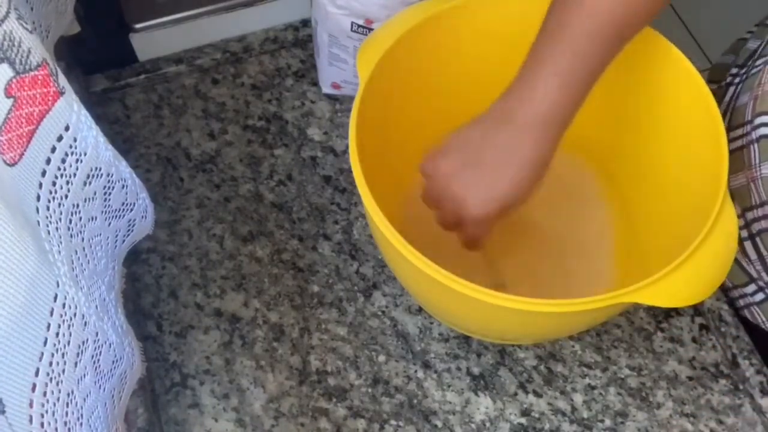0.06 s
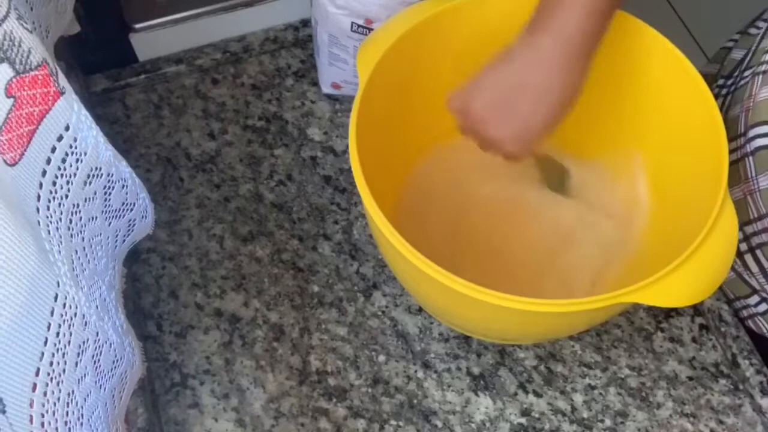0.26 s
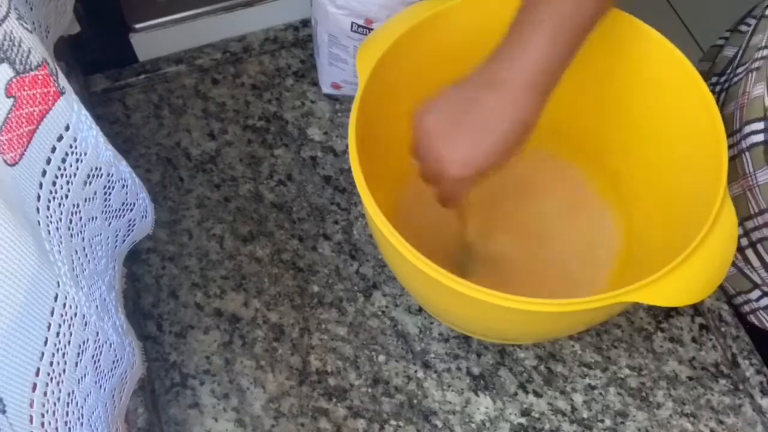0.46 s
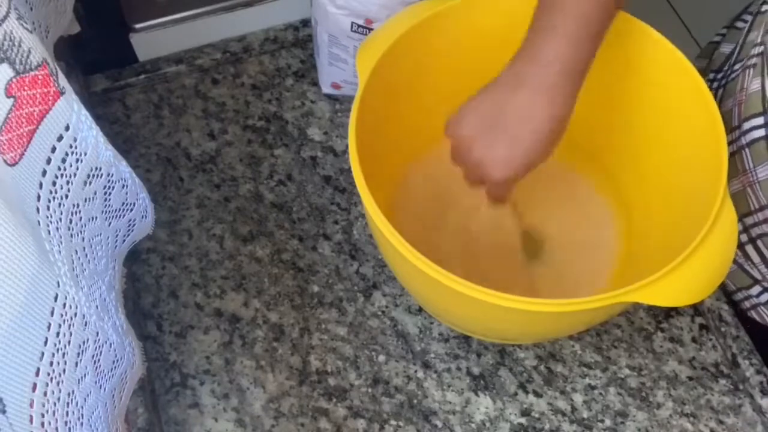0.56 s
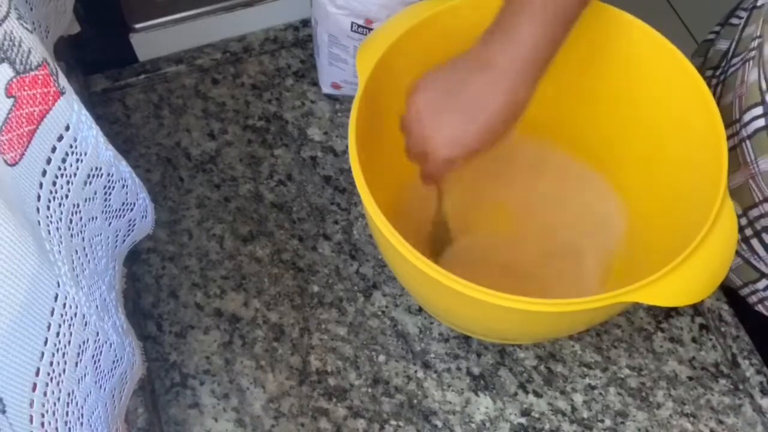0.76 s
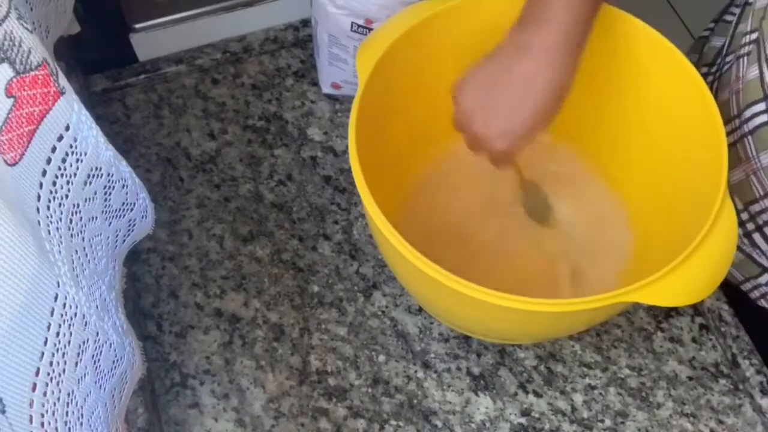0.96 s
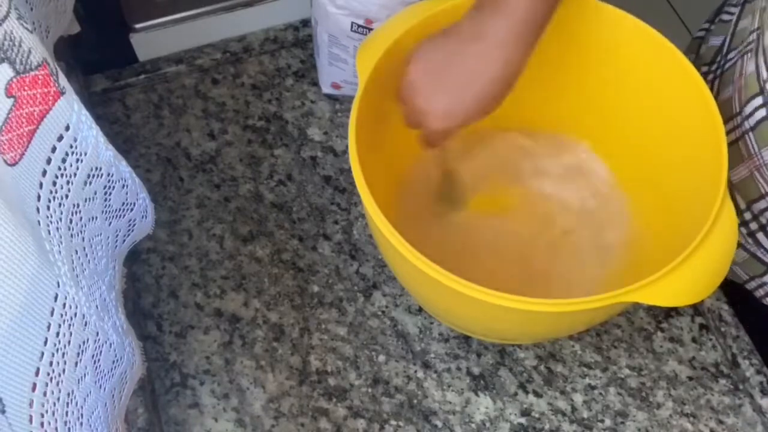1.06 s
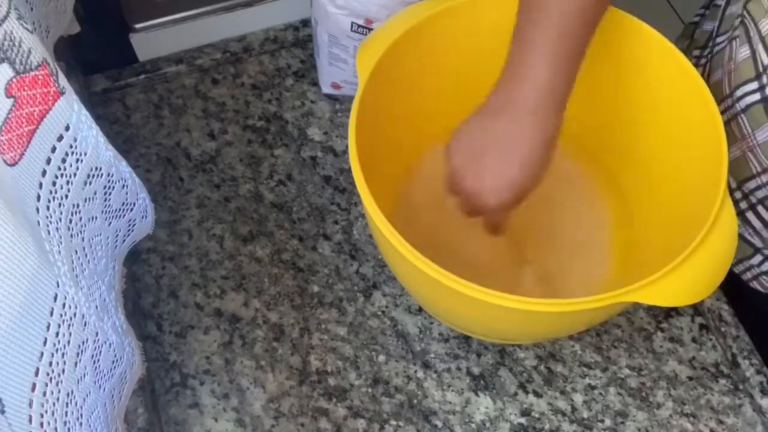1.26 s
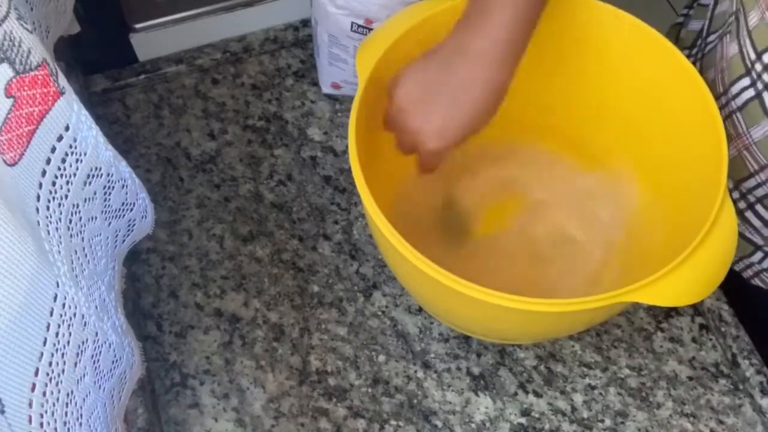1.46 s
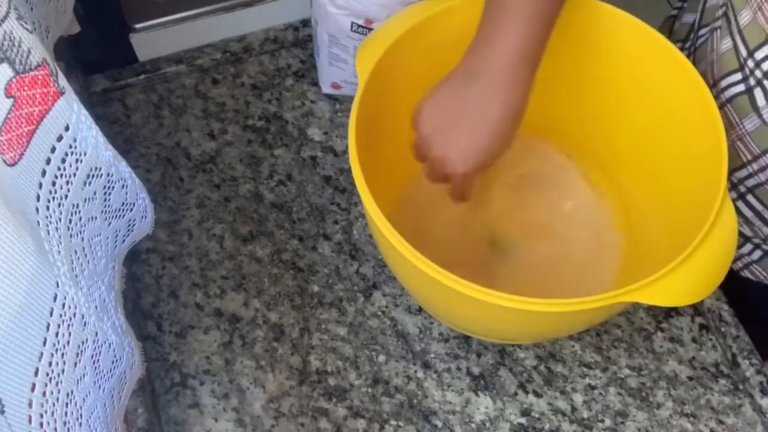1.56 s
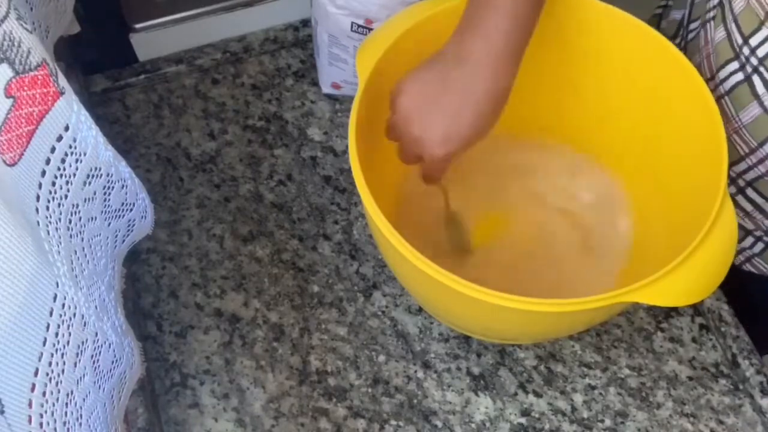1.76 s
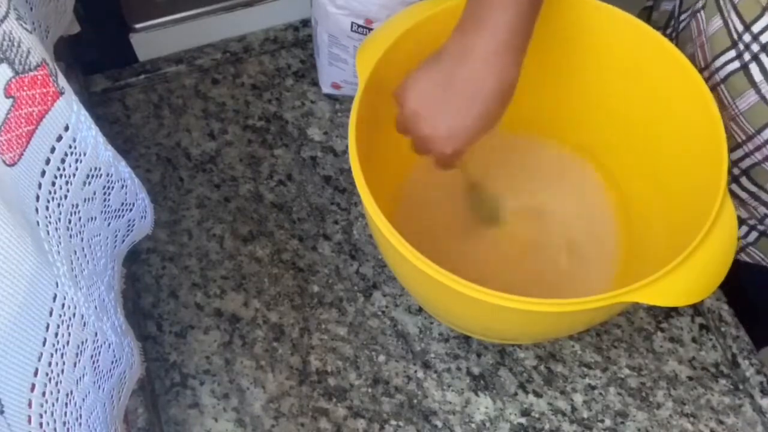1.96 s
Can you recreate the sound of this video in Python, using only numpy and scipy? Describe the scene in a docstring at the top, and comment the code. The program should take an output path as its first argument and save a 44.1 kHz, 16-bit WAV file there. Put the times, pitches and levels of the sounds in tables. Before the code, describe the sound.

A metal spoon stirs thin batter in a plastic bowl, close and in stereo. Dull rubs lead to cracks and hollow knocks at 0.2-0.45 s, strongest near 0.35 and 0.41. A short rasp comes at 0.68, softer knocks until 0.95, then a bright scrape with sharp ticks at 1.03. From 1.15 wet plops, loudest at 1.58 and 1.7, join pulsing swishes. Low appliance hum throughout.

```python
"""A kitchen, at a stone counter: a metal spoon stirs a thin batter in a plastic bowl, heard close by and in stereo.
The spoon rubs and knocks the wall, whose modes ring after each run of slips, with noise bursts as sharp cracks.
It rasps and ticks on the bottom: dense slips through resonances, and very short pings.
The liquid swishes as patchy fizz with a gurgle under it, and plops as brief swelling tones.
An appliance hums underneath, as noise-driven tones and one steady line over quiet broad noise."""
import sys
import numpy as np
from scipy import signal
from scipy.fft import rfft, irfft, next_fast_len
from scipy.io import wavfile
from scipy.ndimage import uniform_filter1d

SR = 44100
rng = np.random.default_rng(int(sys.argv[2]) if len(sys.argv) > 2 else 0)


def invert_db(x):
    """Field ratio 10**(x/20) for x, a level in decibels (scalar or array-like)."""
    u = np.asarray(x, float) / 20
    return 10 ** u


def to_wav(s):
    """Save 16-bit WAV."""
    ch = np.atleast_2d(s).T  # columns
    pcm = np.round(np.clip(ch, -1, 1) * 32767)  # PCM
    wavfile.write(sys.argv[1], SR, pcm.astype(np.int16))


N = 88200  # samples, two seconds


def evened(x):
    """Brings a signal to an rms of 1."""
    return x / np.sqrt(np.mean(x ** 2) + 1e-20)


def read(points, hz):
    """Reads a table of (f/Hz, value) along a logarithmic frequency axis."""
    f, value = np.transpose(points)
    return np.interp(np.log(hz + 1), np.log(f + 1), value)


def curve(rows):
    """Draws straight lines in time through rows of (t/s, value)."""
    return np.interp(np.arange(N) / SR, *np.transpose(rows))


def add(mix, s, sound):
    """Lays a sound into the mix from s seconds on."""
    part = mix[round(s * SR):][:len(sound)]
    part += sound[:len(part)]


def resonate(x, hz, width):
    """One damped resonance of gain about 1 at its centre; width in Hz."""
    r = np.exp(-np.pi * width / SR)
    return 2 * signal.lfilter([1 - r], [1, -r * np.exp(2j * np.pi * hz / SR)], x).real


def clicks(per_s, spread_db):
    """Sparse clicks of random sign, a few of them large, at an rms of 1."""
    chance, size, sign = rng.random(N), rng.exponential(1, N), rng.standard_normal(N)
    heights = np.sign(sign) * invert_db(spread_db * np.minimum(size, 4))
    present = np.clip((per_s / SR - chance) * 5000, 0, 1)
    return evened(heights * present)


# Modes of the plastic wall: f/Hz, relative level/dB, t60/s
WALL_MODES = [(222.8, 8.5, 0.45), (336.7, 2.5, 1), (367.7, -6, 0.78), (508.3, 1.5, 0.46),
              (622, 14.5, 0.019), (685, 1, 0.1), (832.6, -2, 0.59), (905, 5.5, 0.021), (1148, 3, 0.16),
              (1372, 3.5, 0.026), (1556, -6.5, 0.098), (1634, -10, 0.16), (2164, -2.5, 0.11),
              (3194, 2.5, 0.053)]
# Touches of the spoon on the wall: start t/s, length t/s, level/dB of the ringing before its fades,
# middle f/Hz of the modes reached, spread/octaves
WALL_TOUCHES = [(0, 0.09, -37, 410, 0.54), (0.125, 0.15, -35.5, 386, 0.12), (.13, 0.085, -35, 890, 0.48),
                (.214, 0.0074, -22, 970, 0.71), (.289, 0.02, -25.5, 950, 1.3),
                (.313, 0.0058, -22.5, 1070, 0.65), (0.35, 0.044, -17, 344, 0.4),
                (0.35, 0.008, -12.5, 1090, 1.8), (0.396, 0.012, -22, 1040, 0.45),
                (.412, 0.0053, -14, 1520, 1), (.424, 0.05, -24.5, 1206, 0.33), (.43, 0.037, -26, 456, 0.65),
                (.497, 0.049, -33.5, 1180, 0.17), (0.493, 0.064, -36, 477, 1.1),
                (0.559, 0.1, -45.5, 470, 0.27), (0.684, 0.018, -26, 1465, 0.15),
                (0.769, 0.015, -26, 594, 0.85), (0.838, 0.039, -25.5, 690, 0.83),
                (.905, 0.02, -25.5, 850, 0.82), (0.929, 0.081, -33, 290, 0.97),
                (1.151, 0.026, -32, 245, 0.54)]
RUB_PER_S, RUB_SPREAD_DB = 900, 3
FIRST_SLIP = 45  # against the rms of the small slips
BODY_DB = -7  # dull noise of the whole wall, against its modes
SOFT_START, TOUCH_RELEASE_S = 0.11, 0.031  # share of a touch spent rising; decay constant
WALL_CUT_HZ = 193


def wall():
    """Each touch is a first slip and a run of small ones that ring the nearby modes; the batter damps them after."""
    slips, out, t = clicks(RUB_PER_S, RUB_SPREAD_DB), np.zeros(N), np.arange(SR // 4) / SR
    hz, db, t60 = np.transpose(WALL_MODES)[:, :, None]
    modes = invert_db(db - 60 * t / t60) * np.sin(2 * np.pi * hz * t)
    for s, length, level_db, middle_hz, octaves in WALL_TOUCHES:
        drive = slips[round(s * SR):][:len(t)] + FIRST_SLIP * (t == 0)
        reach = np.exp(-(np.log2(hz / middle_hz) / octaves) ** 2)
        ringing = signal.fftconvolve(drive, (reach * modes).sum(0))[:len(t)]
        width = octaves * middle_hz
        body = resonate(resonate(drive, middle_hz, width), middle_hz, width)
        touching = t < length
        sound = ringing / np.std(ringing[touching]) + invert_db(BODY_DB) * body / np.std(body[touching])
        rise = np.minimum(t / (SOFT_START * length), 1)
        damping = np.exp(-np.maximum(t - length, 0) / TOUCH_RELEASE_S)
        add(out, s, invert_db(level_db) * sound * rise * damping)
    return signal.sosfilt(signal.butter(3, WALL_CUT_HZ, "high", fs=SR, output="sos"), out)


# Swish of liquid round the spoon, swelling with each stroke: t/s, fizz level/dB before SWISH_OVER_DB
SWISH_LEVEL = [(0, -55), (.17, -59.5), (.24, -55.5), (.45, -50.5), (.56, -59.5), (.61, -49.5), (.67, -46.5),
               (.73, -52.5), (.9, -50.5), (.94, -49.5), (1.0, -43.5), (1.05, -38.5), (1.075, -54),
               (1.13, -56), (1.27, -50.5), (1.39, -45.5), (1.47, -41.5), (1.495, -55), (1.53, -40.5),
               (1.6, -43.5), (1.635, -57.5), (1.67, -46), (1.72, -39.5), (1.77, -56.5), (1.8, -39),
               (1.85, -43.5), (1.88, -53.5), (2, -43.5)]
# Colour of the fizz: f/Hz, relative level/dB
SWISH_TONE_CURVE = [(600, -9), (1500, 4.5), (3000, 0), (4500, -3), (7000, 1.5), (11000, -3.5), (14500, -8),
                    (16200, -21)]
# Resonances of the liquid-loaded bottom: f/Hz, first-pass width f/Hz, relative level/dB
GURGLE_MODES = [(1400, 230, 9), (2140, 96, -1), (3680, 910, 3)]
SWISH_OVER_DB, SWISH_PER_S, SWISH_SPREAD_DB = 8, 5000, 2
PATCH_DB = 6  # rms unevenness of the fizz over time and frequency
GURGLE_DB, GURGLE_FOLLOWS = -43, 0.13  # level at a mean swish; share of the swells that it follows


def swish():
    """Fine patchy fizz of the liquid, and the gurgle it sets up in the bottom of the bowl."""
    hz, t, z = signal.stft(clicks(SWISH_PER_S, SWISH_SPREAD_DB), SR, nperseg=256, noverlap=192)
    patches = uniform_filter1d(rng.standard_normal(z.shape), size=5, axis=0)
    patches = evened(uniform_filter1d(patches, size=12, axis=1))
    tone_db = read(SWISH_TONE_CURVE, hz)[:, None] + PATCH_DB * patches
    fizz = signal.istft(z * invert_db(tone_db), nperseg=256, noverlap=192)[1][:N]
    drops = clicks(1500, 3.5)
    gurgle = sum(invert_db(db) * evened(resonate(resonate(drops, f, w), f, 4.7 * w)) for f, w, db in GURGLE_MODES)
    db = curve(SWISH_LEVEL)
    gurgle_db = GURGLE_DB + GURGLE_FOLLOWS * (db - db.mean())
    return invert_db(db + SWISH_OVER_DB) * evened(fizz) + invert_db(gurgle_db) * evened(gurgle)


# Motor tones ahead of the bass cut: f/Hz, first-pass width f/Hz (unused by the middle row), rms level/dB
HUM_TONES = [(58, 14.4, -37.5), (120.2, 2, -40.5), (218.6, 15.3, -48)]
# Colour of the quiet kitchen noise: f/Hz, relative level/dB per Hz
FLOOR_TONE = [(40, -50), (90, -18), (230, -4), (600, -19), (1200, -12), (3000, -35)]
FLOOR_DB = -40.5  # rms, ahead of the bass cut


def hum():
    """Two noise-driven motor tones and a line of wavering level, over the quiet noise of the kitchen."""
    noise = rng.standard_normal((len(HUM_TONES) + 1, N))
    tones = sum(invert_db(db) * evened(resonate(resonate(z, hz, w), hz, 3 * w))
                for (hz, w, db), z in zip(HUM_TONES[::2], noise))
    hz, _, db = HUM_TONES[1]
    waver = 1 + 0.24 * evened(resonate(noise[2], 5.6, 6.7))
    line = np.sqrt(2) * invert_db(db) * np.sin(2 * np.pi * hz * np.arange(N) / SR) * waver
    air = irfft(rfft(noise[-1]) * invert_db(read(FLOOR_TONE, np.fft.rfftfreq(N, 1 / SR))), N)
    return tones + line + invert_db(FLOOR_DB) * evened(air)


# Sharp cracks of metal on plastic: t/s, treble level/dB and 2-4 kHz part level/dB before decay,
# decay constant t/s
WALL_CRACKS = [(.194, -31, -35, 0.017), (.351, -25.5, -21.5, 0.014), (0.411, -29.5, -27, 0.013),
               (1.166, -37, -46, 0.008), (1.239, -58, -32.5, 0.0019), (1.399, -39, -27, 0.0059),
               (1.524, -54, -30.5, 0.0015), (1.583, -55, -29.5, 0.0078)]
CRACK_SNAP = 7  # the first contact, against the noise that follows


def cracks():
    """The sharpest contacts each give a snap and a burst of bright noise that dies away."""
    out, t = np.zeros(N), np.arange(4000) / SR
    for (s, db, mid_db, decay_s), z in zip(WALL_CRACKS, rng.standard_normal((len(WALL_CRACKS), 4000))):
        z = z + CRACK_SNAP * (t == 0)
        treble = evened(resonate(z, 8000, 6000))
        mid = evened(resonate(resonate(z, 2240, 3000), 2270, 3200))
        add(out, s, (invert_db(db) * treble + invert_db(mid_db) * mid) * np.exp(-t / decay_s))
    return out


# Rasps on the bottom: start t/s, length t/s before the tail, level/dB once risen
BOTTOM_RASPS = [(0.675, 0.017, -24.5), (1.014, 0.039, -22.5)]
# Resonances that colour the rasps: f/Hz, width f/Hz of each of two passes, relative level/dB
RASP_RESONANCES = [(1400, 110, 1), (1640, 250, 1.5), (2320, 860, 4.5), (3150, 420, -2.5), (3700, 270, 3),
                   (5470, 7100, 4), (11200, 4000, -9)]
RASP_PER_S, RASP_SPREAD_DB = 3500, 3.5
RASP_RISE_S, RASP_TAIL_S = 0.0096, 0.012  # straight rise; decay constant


def rasps():
    """Short bursts of dense slips of the spoon's edge along the bottom, heard through broad resonances."""
    t, slips, body = np.arange(N) / SR, clicks(RASP_PER_S, RASP_SPREAD_DB), np.zeros(N)
    for k, (hz, w, db) in enumerate(RASP_RESONANCES):
        # neighbours take opposite signs
        body += (-1) ** k * invert_db(db) * evened(resonate(resonate(slips, hz, w), hz, w))
    envelope = np.zeros(N)
    for s, length, db in BOTTOM_RASPS:
        tail = np.exp(-np.maximum(t - s - length, 0) / RASP_TAIL_S)
        envelope += invert_db(db) * np.clip((t - s) / RASP_RISE_S, 0, 1) * tail
    return evened(body) * envelope


# Grit ticking under the spoon's edge: t/s (peak comes TICK_S later), peak level/dB, f/Hz
GRIT_TICKS = [(.866, -26.5, 3450), (1.031, -22, 2900), (1.039, -11.5, 3790), (1.043, -16, 4070),
              (1.051, -13.5, 4140), (1.372, -28.5, 4200), (1.408, -24.5, 4820), (1.813, -35, 3660)]
TICK_S = 0.00091  # standard deviation of the bell-shaped swell


def ticks():
    """Grit gives very short high pings that swell and fade."""
    t, out = np.arange(300) / SR, np.zeros(N)
    shape = np.exp(-(t / TICK_S - 2) ** 2 / 2)
    for s, db, hz in GRIT_TICKS:
        add(out, s - TICK_S, invert_db(db) * np.sin(2 * np.pi * hz * t) * shape)
    return out


# Plops of air pockets: t/s (peak comes PLOP_S later), fundamental's peak level/dB, f/Hz,
# overtone level/dB against the fundamental
AIR_PLOPS = [(1.16, -25.5, 1515, -17), (1.1715, -26, 1670, -13.5), (1.2396, -25.5, 1337, -21),
             (1.358, -27, 1320, -4), (1.3715, -25, 1540, -27), (1.4021, -24, 1670, -28),
             (1.431, -24, 1400, -10), (1.5234, -23.5, 2350, -3), (1.5827, -12.5, 1425, -5),
             (1.6014, -25.5, 2300, -24), (1.701, -13.5, 1466, -36), (1.734, -21, 1310, -18),
             (1.8116, -29.5, 1406, -6), (1.847, -28, 1485, 0.5), (1.9621, -26.5, 1400, -22),
             (1.982, -25.5, 1560, -12), (1.9945, -20.5, 1530, -11)]
PLOP_S, PLOP_OVERTONE = 0.001354, 1.578  # standard deviation of the swell; frequency ratio


def plops():
    """Each pocket of air gives a few cycles that swell and fade, with one overtone."""
    t, out = np.arange(600) / SR, np.zeros(N)
    shape = np.exp(-(t / PLOP_S - 2) ** 2 / 2)
    for s, db, hz, over_db in AIR_PLOPS:
        overtone = invert_db(over_db) * np.sin(2 * np.pi * PLOP_OVERTONE * hz * t)
        tone = np.sin(2 * np.pi * hz * t) + overtone
        add(out, s - PLOP_S, invert_db(db) * tone * shape)
    return out


# Phase between left and right channels, stepping by half turns in the treble: f/Hz, phase/rad
CHANNEL_PHASE = [(3800, 0), (5600, -1), (7600, -np.pi), (9400, -np.pi), (11400, -2 * np.pi),
                 (13800, -2 * np.pi), (15200, -3 * np.pi)]
# Direct share of the power, the rest being reflections: f/Hz, share
DIRECT_SHARE = [(150, .99), (600, .65), (1400, .78), (4000, .55), (7000, .85), (7700, .99)]
# Left channel over right channel: f/Hz, level/dB
LEFT_OVER_RIGHT = [(1000, 2), (2500, 3.5), (7500, 0)]
ROOM_T60_S = 0.12
FRONTAL = 0.56  # reflections from the front, against those from the sides


def scene():
    """All sources reach two channels, with a phase between them and a share of reflections, mostly from the sides."""
    size = next_fast_len(N + SR)
    t, hz = np.arange(SR // 2) / SR, np.fft.rfftfreq(size, 1 / SR)
    taps = rng.standard_normal((2, len(t))) * invert_db(-60 * t / ROOM_T60_S) * (t > .002)
    front, sides = rfft(taps / np.linalg.norm(taps[0]), size)
    tails = np.array([FRONTAL * front + sides, FRONTAL * front - sides])
    share = np.clip(read(DIRECT_SHARE, hz), 0, 1)
    side = np.array([[.5], [-.5]])  # left, right
    direct = np.sqrt(share) * np.exp(1j * side * read(CHANNEL_PHASE, hz))
    channels = invert_db(side * read(LEFT_OVER_RIGHT, hz)) * (direct + np.sqrt(1 - share) * tails)
    sources = wall() + swish() + hum() + cracks() + rasps() + ticks() + plops()
    return irfft(rfft(sources, size) * channels, size)[:, :N]


def band_limit(x):
    """A steep low-pass at the top of the band."""
    return signal.sosfilt(signal.butter(12, 16430, fs=SR, output="sos"), x)


def record(dry):
    """The microphone's bass cut thins everything below 58 Hz."""
    bass_cut = signal.butter(4, 58, "high", fs=SR, output="sos")
    mix = signal.sosfilt(bass_cut, dry)
    return band_limit(mix)


dry = scene()
out = record(dry)
to_wav(out)
```